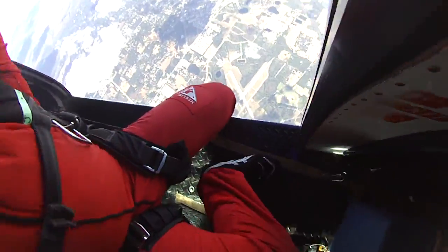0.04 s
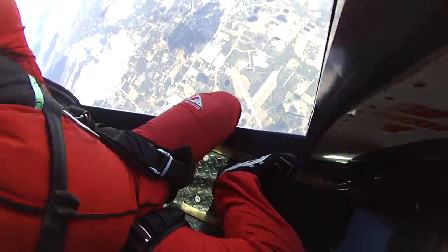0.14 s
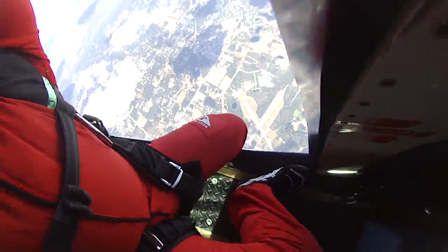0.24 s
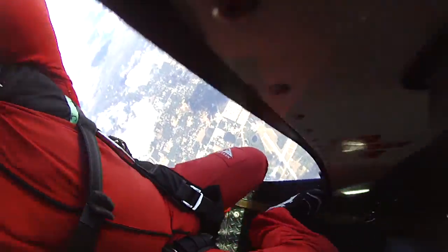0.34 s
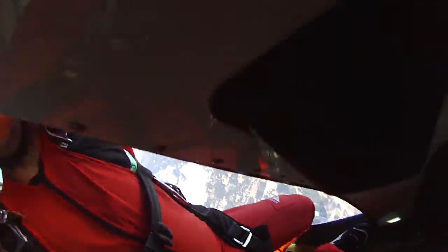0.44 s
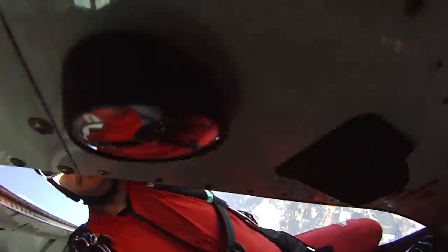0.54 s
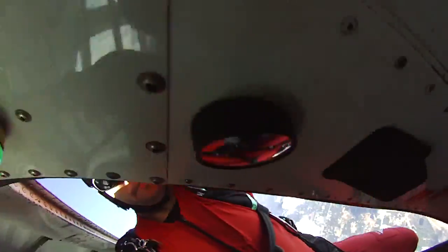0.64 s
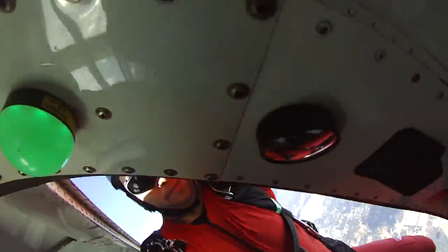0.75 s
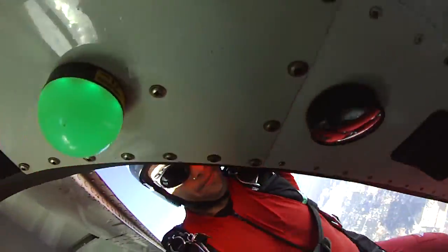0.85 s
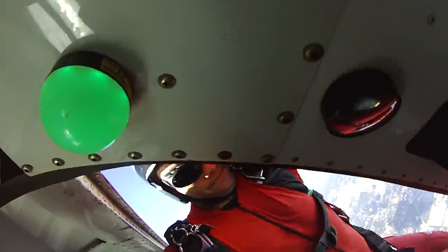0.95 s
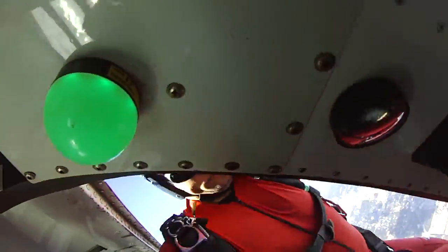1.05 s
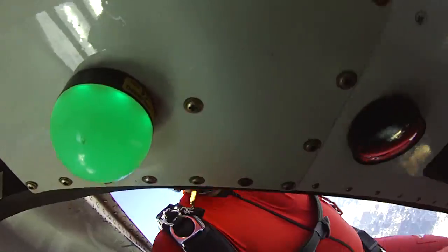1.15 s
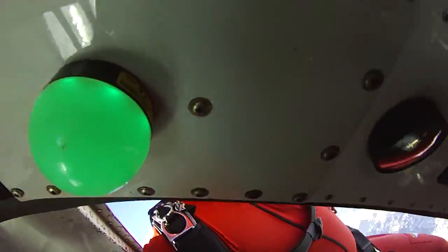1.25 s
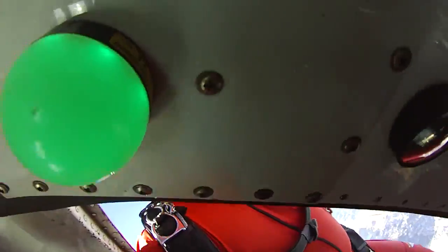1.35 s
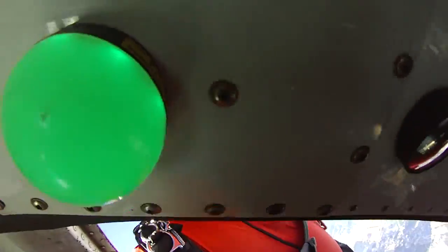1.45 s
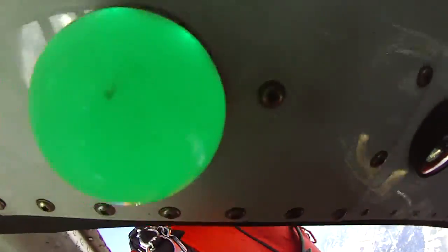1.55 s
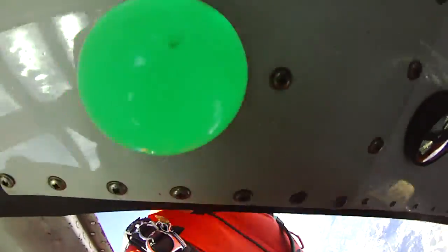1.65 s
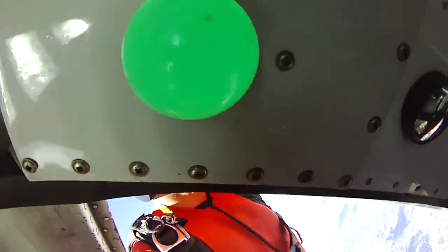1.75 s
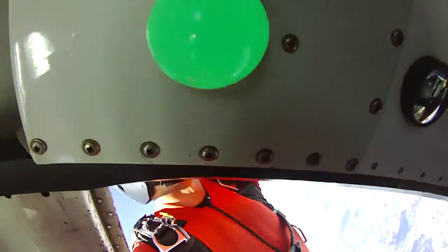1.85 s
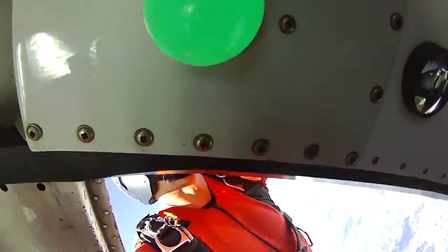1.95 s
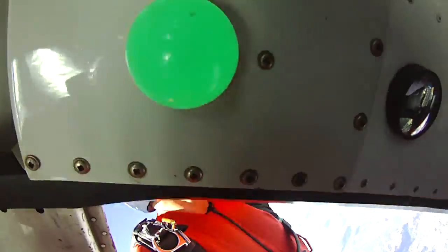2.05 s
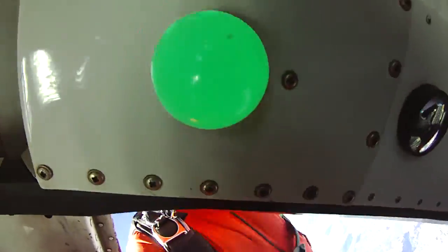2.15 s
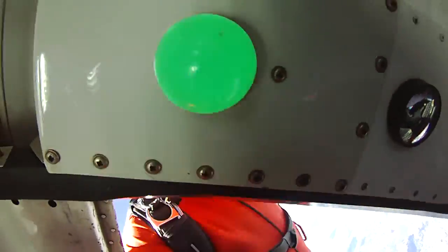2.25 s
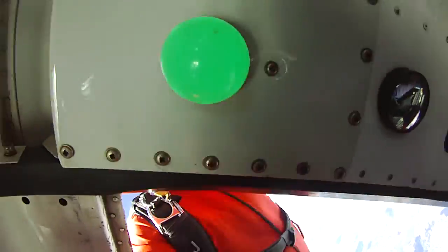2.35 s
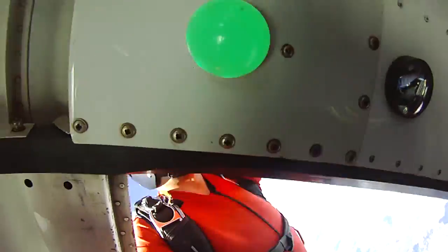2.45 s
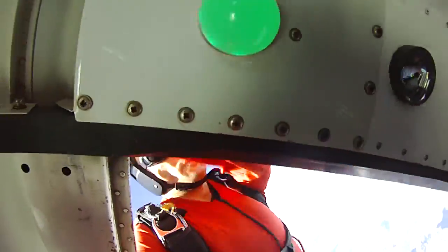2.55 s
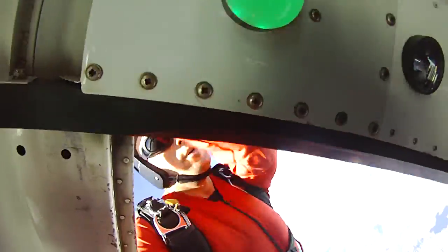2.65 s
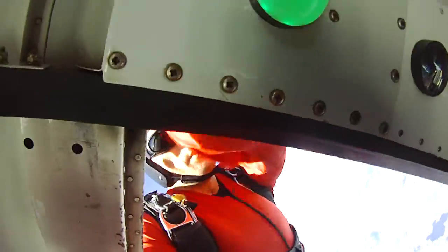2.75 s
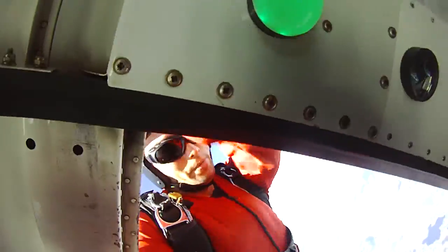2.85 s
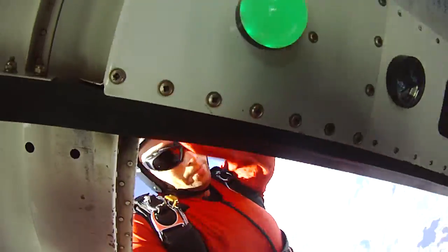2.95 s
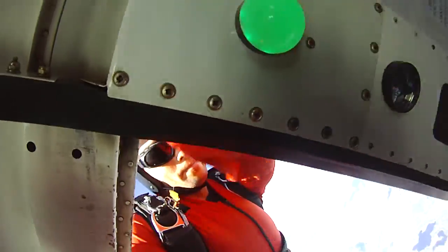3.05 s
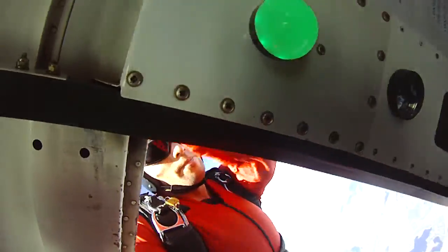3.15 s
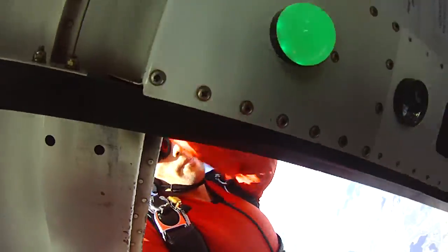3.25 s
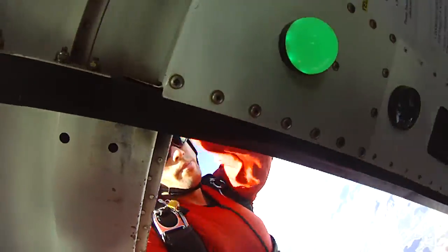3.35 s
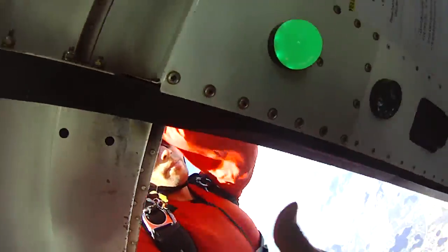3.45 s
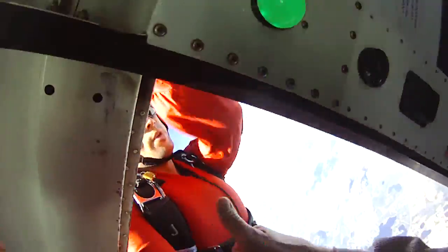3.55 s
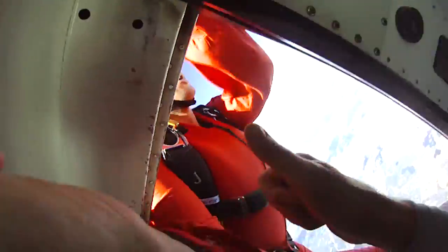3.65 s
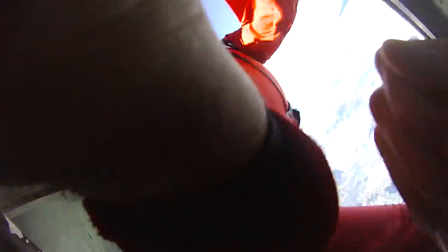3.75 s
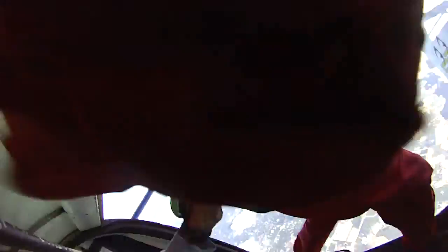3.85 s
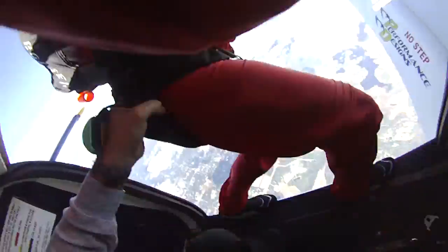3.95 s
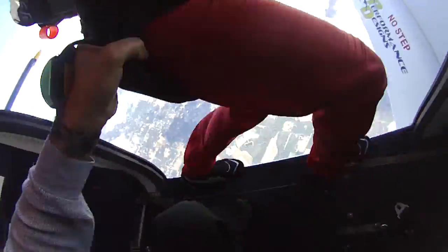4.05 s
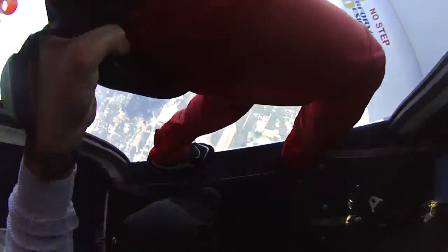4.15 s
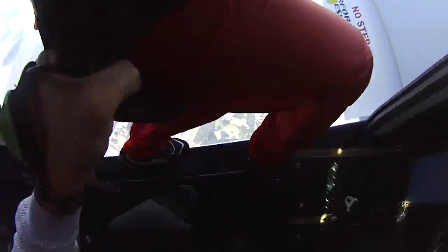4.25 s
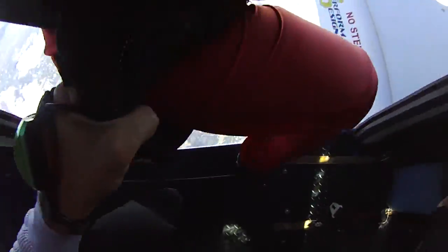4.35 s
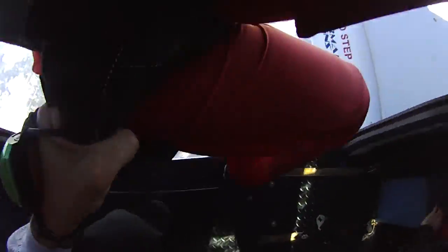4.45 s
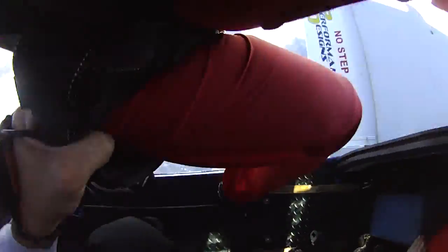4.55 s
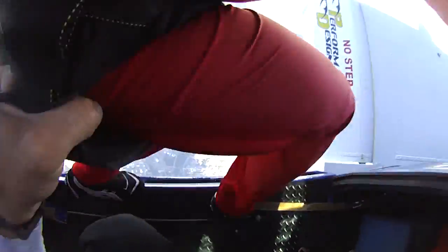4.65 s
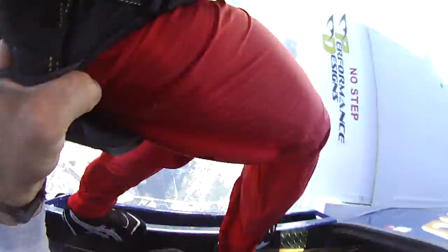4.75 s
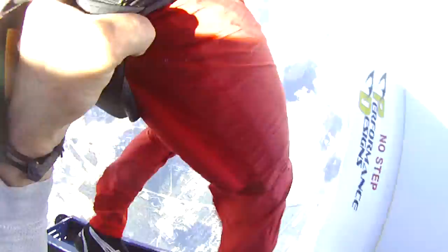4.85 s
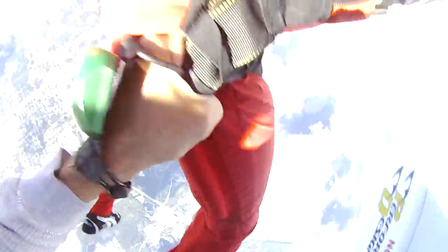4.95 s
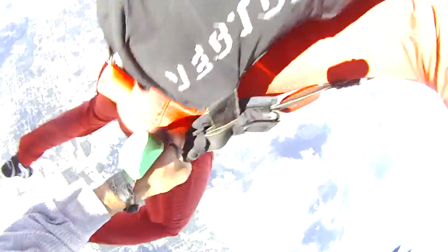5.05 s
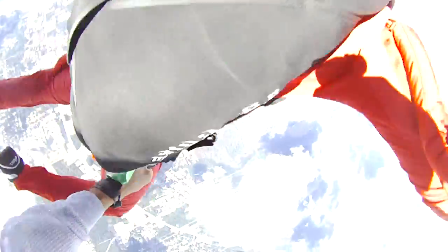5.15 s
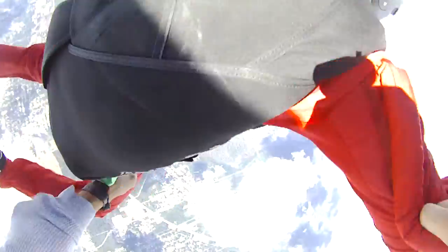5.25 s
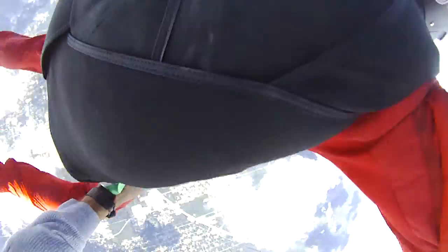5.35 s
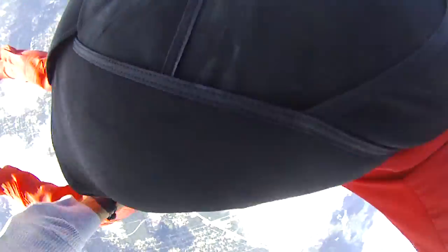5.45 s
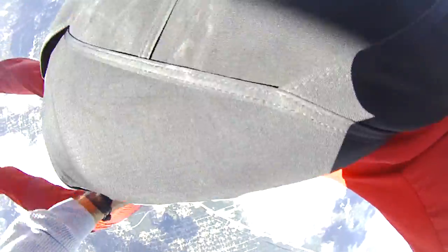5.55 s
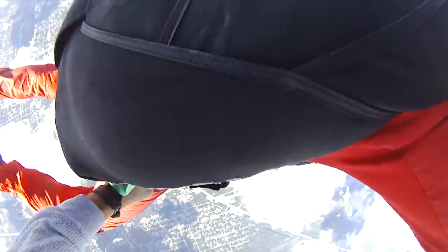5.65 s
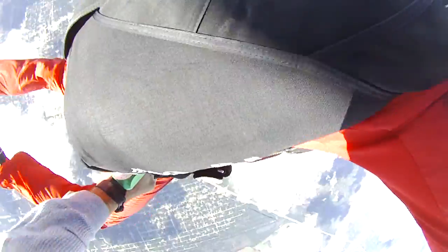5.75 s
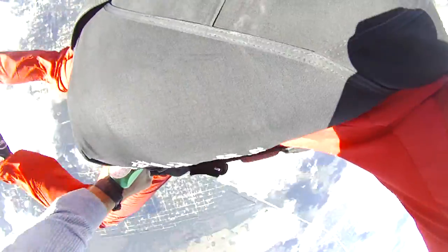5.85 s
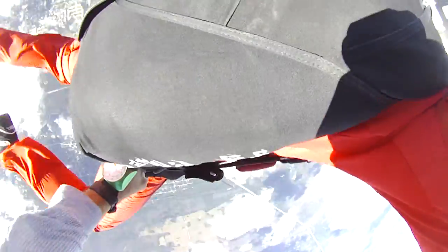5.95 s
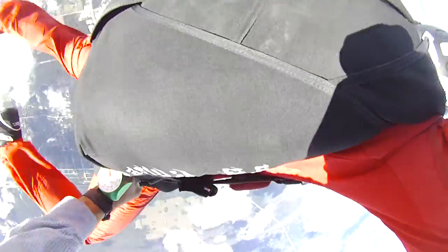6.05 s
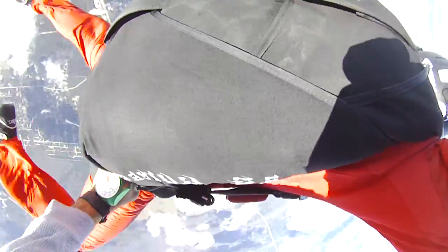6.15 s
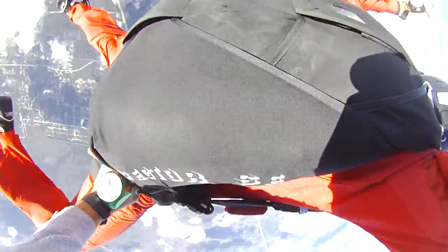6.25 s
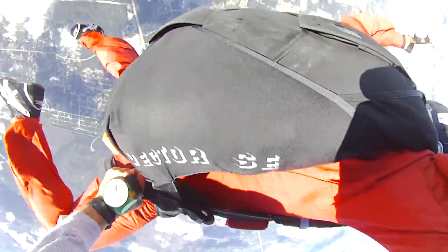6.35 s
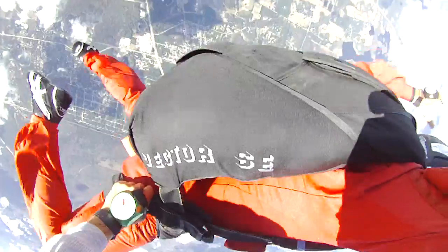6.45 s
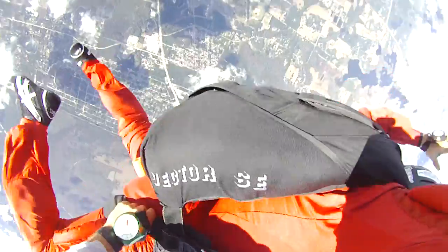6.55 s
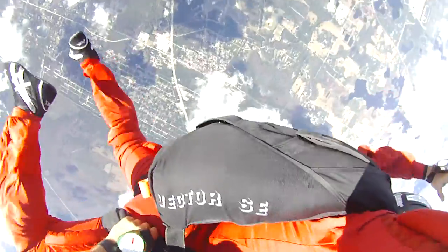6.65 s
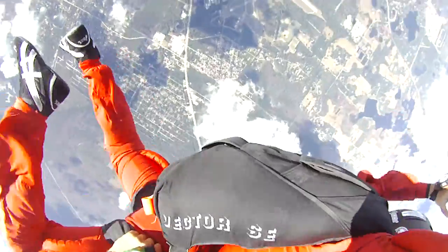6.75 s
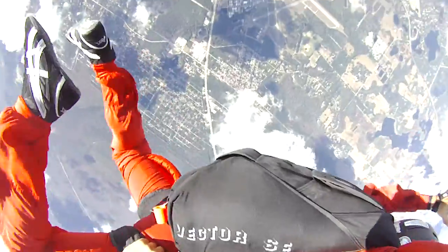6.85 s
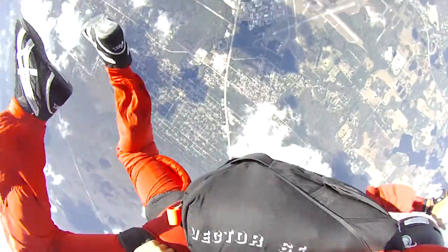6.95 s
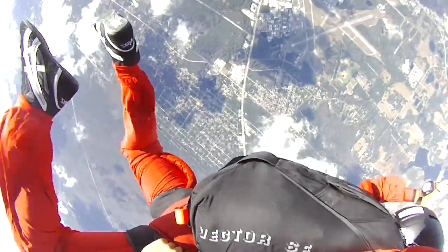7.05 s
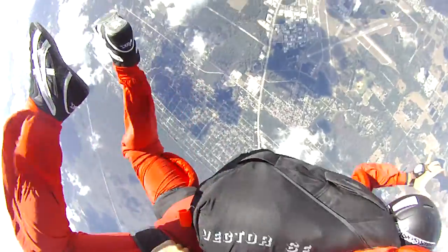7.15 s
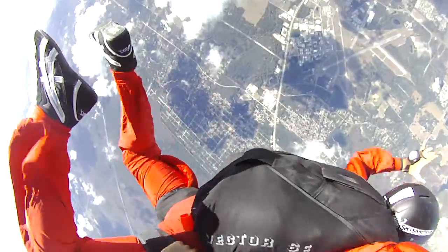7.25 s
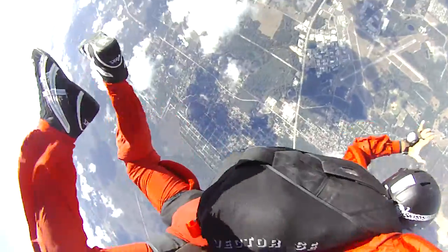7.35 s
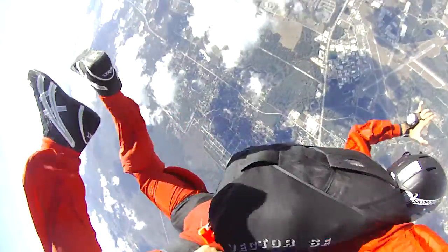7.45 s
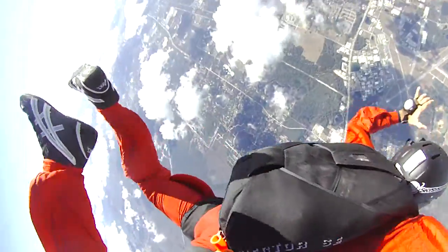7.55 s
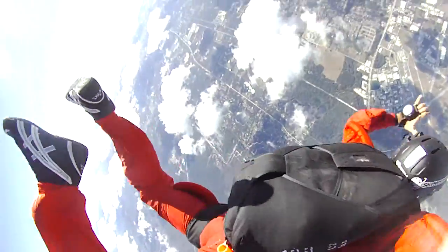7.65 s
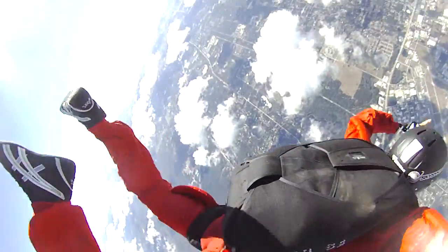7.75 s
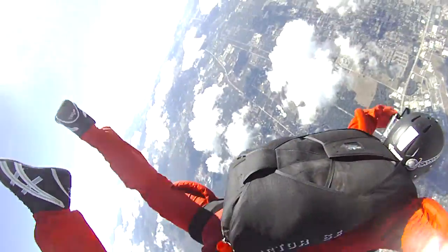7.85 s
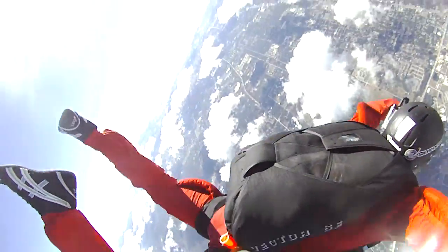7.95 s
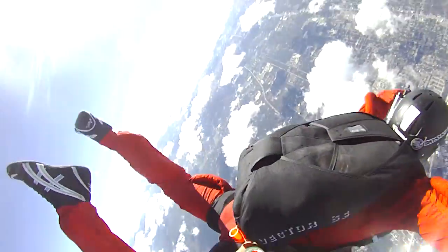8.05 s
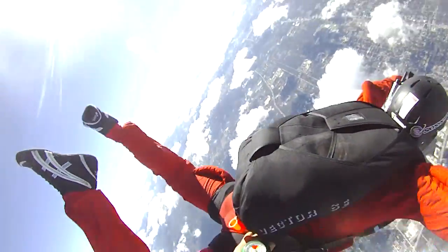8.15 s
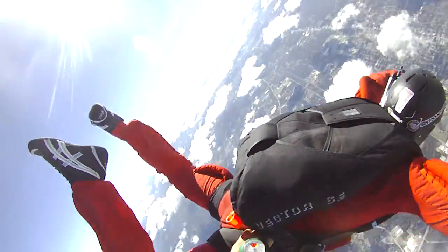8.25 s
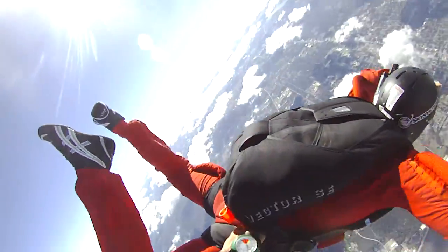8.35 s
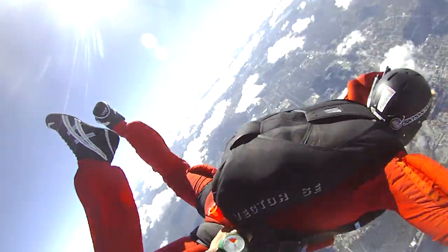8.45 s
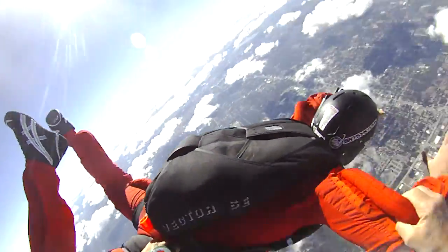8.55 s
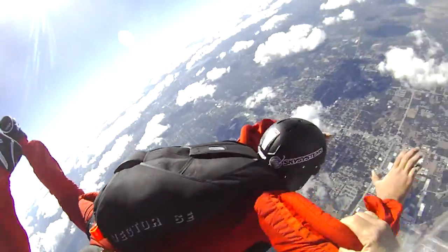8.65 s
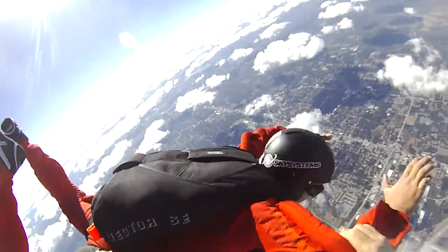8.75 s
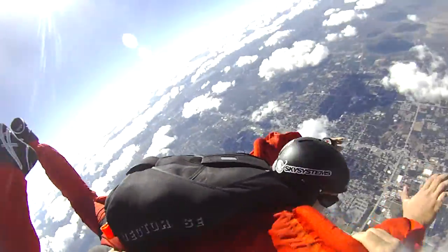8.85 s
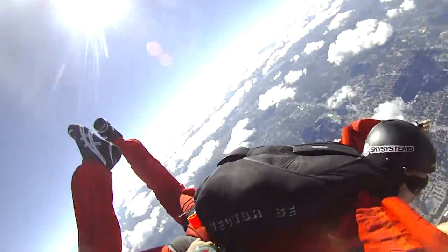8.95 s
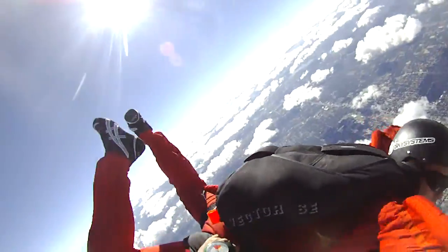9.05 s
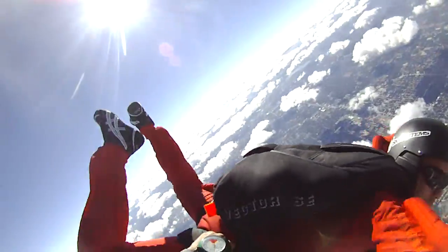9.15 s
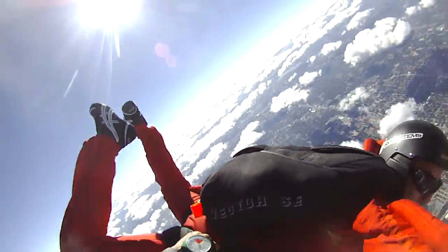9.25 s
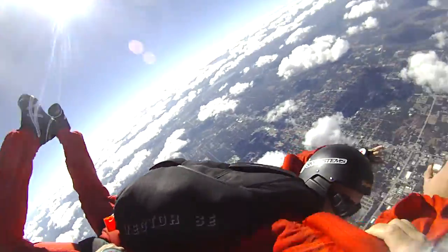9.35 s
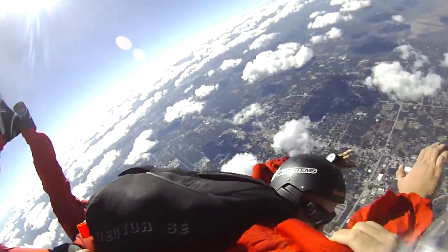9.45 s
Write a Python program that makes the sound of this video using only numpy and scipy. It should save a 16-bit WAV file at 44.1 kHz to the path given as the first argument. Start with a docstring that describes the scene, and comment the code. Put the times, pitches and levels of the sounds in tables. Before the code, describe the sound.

A small helmet microphone hears steady muffled aircraft rumble, with gusts of air at the door and an almost buried propeller hum. A short bright rattle of buckles precedes fluttering wind. The skydiver drops out and harsh, roaring slipstream swamps everything, tearing and snapping. Later the microphone is sheltered: the wind becomes far softer, dull and uneven, with dense membrane pops, tiny dropouts and a rise at the end.

```python
"""A cabin roars around a skydiver who waits, helmet camera on, at the open door of a propeller aircraft.
Close by, harness metal rings as it knocks and slides, and cloth rustles in grainy noise.
On the climb out the slipstream tears across the microphone: noise bands switched by shared eddies.
In the fall the microphone turns into the lee, where the wind is dull and lumpy.
Eddies pop its membrane: each is a filtered push with a crackle, and some leave it deaf for an instant."""
import sys
import numpy as np
from scipy import signal
from scipy.io import wavfile
from scipy.ndimage import uniform_filter1d

SR = 44100
rng = np.random.default_rng(int(sys.argv[2]) if len(sys.argv) > 2 else 0)


def bounce(signal):
    """Save signal as a 16-bit WAV file at the path given by the first command-line argument."""
    frames = np.transpose(np.atleast_2d(signal))
    limited = np.clip(frames, -1, 1)
    pcm = np.round(limited * 32767).astype(np.int16)
    wavfile.write(sys.argv[1], SR, pcm)


N = 419832
TIME = np.arange(N) / SR

# Hiss of the surrounding air in the camera housing. Each row: time in seconds, level in dB.
HISS = [(0, -70.5), (.35, -67.5), (1.6, -66.5), (2.9, -63.5), (3.7, -67), (4.3, -64.5), (7.6, -68.5),
        (8.05, -73), (8.6, -68), (9.15, -69), (9.5, -69)]
# Resonances of the housing. Each row: centre in Hz, width in Hz, relative level in dB.
HOUSING = [(3190, 1100, 1), (3620, 320, -6.5), (4460, 410, -0.5), (4900, 230, -4.5), (5820, 1170, -2),
           (7400, 1200, -14.5), (8580, 1000, -8), (9570, 1000, -11.5), (11700, 2800, -13.5)]
HISS_FOLLOWS = 0.6   # share of each swell of the rush, in dB per dB

# Cabin roar, fading as the aircraft is left behind. Each row: time in seconds, level in dB.
CABIN = [(0, -40), (0.65, -36.5), (1.1, -41), (1.5, -37.5), (2.8, -35.5), (3.7, -37), (4.1, -38.5),
         (5.0, -50), (6.5, -81.5)]
# Spectrum of the roar. Each row: frequency in Hz, relative density in dB per Hz.
CABIN_COLOUR = [(20, -26), (40, -5.5), (80, -3), (130, 2), (200, -1), (300, -3.5), (420, -6.5), (800, -13),
                (1150, -15.5), (1900, -22.5), (2600, -27.5), (5000, -60)]
# Air swells and ebbs through the door.
# Each row: centre in seconds, rise in dB, length in seconds, extra rise of the rush in dB.
SWELLS = [(0.392, 0.5, 0.077, 6), (0.5, 0.5, 0.19, 5), (0.676, -7, 0.24, -0.5), (0.903, 2.5, 0.21, 3),
          (1.09, 0.5, .1, 1.5), (1.234, 4.5, 0.11, 5), (1.408, -0.5, 0.17, 2.5), (1.684, -3.5, 0.098, -0.5),
          (1.8, 3.5, 0.11, 3.5), (2.51, -1, .05, 2), (2.7, 1.5, 0.09, 3), (2.997, 1, 0.038, 7),
          (3.11, -1, 0.21, -0.5), (3.54, 5.5, 0.029, 0.5), (3.73, 3, 0.083, 0)]
RUSH_DB, RUSH_FOLLOWS = -10.5, 0.086   # upper rush against the rumble; its share of each swell
PROPELLER_HZ, PROPELLER_DB = 178, -14   # mean blade tone; its level against the rumble without swells

# Cloth brushes by. Each row: centre in seconds, level in dB before dulling, length in seconds.
RUSTLES = [(0.435, -52, 0.02), (3.789, -50, .008)]

# Harness metal knocks together.
# Each row: start in seconds, peak in dB, strongest ring in Hz, dry tick against the ring (ratio).
CLINKS = [(1.132, -52, 8500, 2), (3.859, -47, 5900, .5), (3.884, -29.5, 4500, 0.6), (3.896, -36, 5900, 0.6),
          (3.908, -37, 4900, .8), (3.917, -36, 4400, 0.87), (3.9435, -33, 4400, 0.67),
          (4.041, -44, 6000, .8), (4.2, -42, 5000, 1.7)]
# Harness metal slides. Each row: the four columns of a clink, then length in seconds.
SCRAPES = [(3.8, -47.5, 6100, .05, 0.037), (3.926, -36.5, 4200, 0.3, 0.074),
           (3.968, -30, 4200, 0.35, 0.025)]
# Modes of the metal. Each row: frequency in Hz, relative level in dB, 60 dB decay time in seconds.
METAL = [(3890, 1, 0.018), (4320, -4, 0.0088), (4570, -1, 0.007), (5030, -2, .009), (5780, -3, .01),
         (6170, -1, 0.01), (7300, 4, .003), (8700, 16, 0.0039), (10300, 5, .003)]
CLINK_CONTACT_S, SLIPS_PER_S = 0.0008, 5400
RING_FALL_DB_PER_OCTAVE = 21   # away from the strongest ring

# Stream at the microphone: climbing out, falling, turning into the lee.
# Each row: time in seconds, level of the roar in dB.
FLOW = [(3.66, -67), (3.78, -39.5), (3.9, -35), (4, -34), (4.47, -27.5), (4.53, -17), (5.25, -17),
        (5.39, -16), (5.56, -16), (6.1, -16), (6.78, -19), (7.42, -18.5), (7.68, -26), (8.02, -34),
        (8.7, -32.5), (9.13, -34), (9.32, -30), (9.52, -24)]
# Gusts and lulls on top of the stream.
# Each row: centre in seconds, rise in dB, length in seconds, extra tearing in dB.
GUSTS = [(3.97, 5.5, 0.055, -5), (4.253, 5.5, 0.052, 1), (4.358, 4.5, 0.026, 6), (4.406, -4, .03, 1),
         (4.608, 6.5, 0.034, 1.5), (4.67, -2, 0.11, 8.5), (4.79, -5, 0.046, 11), (4.88, 6, 0.013, -3),
         (5.007, 5.5, 0.017, -4.5), (5.123, -5, 0.015, 0.5), (5.363, -4.5, 0.046, -5),
         (5.429, -3.5, 0.027, -8), (5.563, 3.5, 0.056, 0.5), (5.616, -12, 0.015, 11),
         (5.669, 4.5, 0.089, -2.5), (5.695, -4.5, 0.03, -2), (5.774, 1, 0.17, 4), (5.855, -1, 0.034, -2.5),
         (5.899, 6.5, 0.023, -4), (5.985, 5.5, 0.024, -6), (6.298, 0.5, .05, -6.5), (6.588, -5, 0.025, 8.5),
         (6.995, -2.5, 0.063, 3), (6.355, 2, 0.079, 0.5), (7.363, 3, 0.055, -1.5), (7.684, 2, 0.022, -1),
         (7.795, 3.5, 0.033, 2), (8.036, 0, 0.043, 2), (8.129, 4, 0.036, 8.5), (8.31, -0.5, 0.025, -8),
         (8.714, -0.5, .03, 2), (9.07, -1, 0.038, 5), (8.286, 1, 0.1, 7), (8.473, 1.5, 0.15, 8.5),
         (8.61, 5, 0.12, -1), (8.788, 9.5, 0.028, -1), (8.878, 6.5, 0.072, 2), (9.01, 2, 0.047, 5),
         (9.217, 8, 0.02, -1), (9.31, 5.5, 0.039, 0), (9.401, 10, 0.014, -5)]
# Spectrum of the wind. Each row: frequency in Hz, relative density in dB per Hz.
WIND_COLOUR = [(25, -35), (50, -11.5), (90, -5.5), (160, 0.5), (280, 0.5), (450, -5.5), (800, -13.5),
               (1500, -20), (2200, -27.5), (3200, -37), (6000, -45.5), (10000, -60.5), (14000, -70.5)]
# How exposed the microphone port is.
# Each row: time in seconds, tearing against the roar in dB, treble lift in dB, spread of the spitting in dB.
EXPOSURE = [(3.8, -11.5, -9, 4), (4.3, -10.5, -15, 5), (4.65, -19.5, -1.5, 3), (4.9, -14, 3, -3),
            (5.08, -11.5, 11.5, 4), (5.39, -17.5, 5.5, 0), (5.6, -22, 8, 8), (6.12, -14.5, 9, 5.5),
            (6.42, -19, 6, 1.5), (7.15, -16.5, 7, 5.5), (7.5, -25, 2.5, 15), (7.72, -24, 0.5, 5),
            (8.3, -20, -3.5, 4), (9.52, -19.5, -3.5, 4)]
# A weak stream is lumpy, a strong one smoother.
# Each row: flow in dB, low buffeting in dB, spread of the eddies in dB.
CHARACTER = [(-64, -78, 15), (-36.5, -50, 9), (-33, -33, 13), (-25, -32.5, 15), (-25, -35, 9),
             (-2, -40, 2.5)]
# Sharp rips of the flow.
# Each row: centre in seconds, strength in eddy spreads, half-length in ms, extra treble lift in dB.
RIPS = [(4.234, 1.8, 2.5, -2), (4.244, 1.4, 2.5, 1), (4.367, 1.3, 2.4, 1), (4.608, 1.3, 2.1, 3),
        (4.624, 1.6, 3.2, 2), (5.186, 1.8, 3.1, -4), (5.631, 2.2, 2.2, -12), (7.118, 1.4, 2.1, -2),
        (7.369, 1.4, 1.2, 9), (7.382, 1.2, 0.93, 7.5), (7.4067, 1.5, 1.1, 7), (7.4109, 1.8, 1.3, 10),
        (7.437, 1.4, 2, 3), (7.452, 1.4, 1.3, 10), (7.466, 1.9, 1.9, 10), (7.498, 1.8, 2, 11),
        (7.568, 1.63, 3.6, 21.5), (7.612, 1, 5, 12), (7.974, 2.15, 4.6, 7), (8.148, 1.2, 4, 5),
        (8.185, 1.9, 2, 0), (8.274, 2.4, 1.8, -4), (8.609, 1.3, 3, 7), (8.788, 1.1, 1.8, 5),
        (8.83, 1.5, 2.2, 8), (8.886, 1.2, 2.5, 5), (8.96, 2.3, 3, -2), (8.993, 1.8, 1.9, -1),
        (9.294, 2.3, 3, -3), (9.379, 2, 1.7, -2)]
SPITS_PER_S, SPIT_ABOVE_HZ = 730, 2500   # the tiniest eddies, heard mostly in the treble

# Big eddies that hit the membrane.
# Each row: time in seconds, peak in dB before dulling, rise in ms, deaf time in ms (none if negative),
# top of the snap in Hz, crackle against that peak in dB.
POPS = [(3.792, -13, 2.5, 0, 900, -40), (4.424, -13, 0.97, 0, 1000, -31),
        (4.525, -5, 0.98, -2.5, 1500, -22), (5.147, 1.5, 0.29, 3, 2500, -28),
        (5.1835, 4, 0.1, 1.5, 7000, -17), (5.374, -7.5, 0.11, -1.5, 5000, -21),
        (5.487, -6, 0.33, -4, 4000, -17), (5.632, 0, 0.39, -4, 3000, -27), (7.369, -10, .36, 0, 3000, -26),
        (7.767, -12, 1, -5, 2000, -25), (7.8528, -11, 1.7, -3, 1800, -33),
        (7.928, -18.5, 0.63, -3, 4500, -21), (7.9444, -14, 0.79, 7, 3200, -21),
        (8.135, -11, 0.62, 2.5, 4500, -22), (8.221, -13.5, 0.85, 5.5, 4500, -32),
        (8.408, -14.5, 1.2, 1, 1800, -27), (8.419, -14, .6, 5, 2500, -21),
        (8.434, -11.5, 1.5, 5.5, 1400, -32), (8.455, -13, 1.1, 5.5, 3500, -28),
        (8.476, -13.5, 0.74, -2, 2000, -25), (8.564, -18, 1.7, -2.5, 900, -34),
        (8.571, -11, 1.1, 2, 1200, -25), (8.635, -14.5, 1.2, -1, 3500, -24),
        (8.742, -4, .48, 10, 3000, -29), (8.8226, -15, .35, 3.5, 5000, -21),
        (8.834, -11.5, 0.44, 8, 6000, -21), (8.8962, -12.5, 0.84, 5, 6000, -31),
        (8.9084, -8, 0.72, -3, 600, -33), (8.9211, -14, 1.1, 1, 3500, -28),
        (8.957, -14, 1.2, -0.5, 1500, -25), (8.984, -14.5, 0.52, 6.5, 6000, -31),
        (9.006, -12.5, 1.4, -3, 4000, -31), (9.024, -27, 1.2, 6.5, 4000, -20),
        (9.032, -15, 1.9, -1.5, 900, -32), (9.042, -13.5, 0.44, -5, 2500, -22),
        (9.107, -15, 1.9, 3.5, 2000, -28), (9.201, -20, 1.1, 1.5, 2500, -25),
        (9.2161, -13.5, 0.73, 5, 2500, -22), (9.261, -14.5, 0.93, 0, 1800, -20),
        (9.3247, -9.5, 1.2, 0, 1500, -31), (9.335, -13.5, 0.88, -3, 3000, -28),
        (9.386, -18, 1, 0, 2500, -27), (9.399, -11, .9, 1.5, 2200, -23),
        (9.453, -12.5, 0.73, 0.5, 3000, -26), (9.464, -17, 1, 1, 2200, -24)]
# Small eddies pop at random in the lee; rise and snap are means, the deaf time is the longest.
LEE_START_S, LEE_END_S = 7.6, 9.48
SMALL_POPS_PER_S, SMALL_POP_OVER_FLOW_DB, SMALL_POP_RISE_MS = 8, 5, 0.59
SMALL_POP_HELD_MS, SMALL_POP_SNAP_HZ, SMALL_POP_CRACKLE_DB = 1.5, 2500, -22
CRACKLE_S, CRACKLE_LEAD_S = 0.00097, 0.00054   # decay to either side; how far its top precedes the hit
CRACKLE_FALL_DB_PER_OCTAVE, CRACKLE_UNEVEN_DB = 9, 6
POP_TOP_HZ, CUTOFF_HZ = 11000, 15600   # upper limits of the pops and of the microphone channel


def from_db(db):
    """Decibels to gain."""
    return 10 ** (np.asarray(db) / 20)


def rms_one(x):
    """Scale to unit power."""
    return x / np.sqrt(np.mean(x ** 2) + 1e-20)


def in_time(rows):
    """Each column of a curve at every sample."""
    s, *columns = np.transpose(rows)
    return [np.interp(TIME, s, column) for column in columns]


def at_hz(points, hz):
    """Read a spectrum on a log-frequency axis."""
    point_hz, level_db = np.transpose(points)
    return np.interp(np.log(hz), np.log(point_hz), level_db)


def hump(s, length_s):
    """A smooth rise to 1 and fall, length_s wide at half height."""
    return np.exp2(-(2 * (TIME - s) / length_s) ** 2)


def drift(rate):
    """Smooth chance of spread about 1 that changes about rate times a second, without extreme swings."""
    # computed at an eighth of the sample rate; the filter's run-in is dropped
    pole = np.exp(-16 * np.pi * rate / SR)
    steps = rng.standard_normal(N // 8 + 8002)
    slow = signal.lfilter([1], [1, -2 * pole, pole * pole], steps)[8000:]
    limited = 3.3 * np.tanh(rms_one(slow) / 3)
    return np.interp(np.arange(N) / 8, np.arange(len(slow)), limited)


def band_noise(low, high):
    """Noise of unit power between two frequencies."""
    sos = signal.butter(2, [low, min(high, .45 * SR)], "band", fs=SR, output="sos")
    return rms_one(signal.sosfilt(sos, rng.standard_normal(N)))


def flutter(chance, spread_db):
    """A gain that swings by spread_db and roughly keeps the mean power."""
    swing = np.log(10) * spread_db / 20
    return np.exp(swing * chance - swing ** 2)


def airflow(colour, zones, levels_db, eddies, spread_db, small_eddy_hz, own_share, spit_db=0):
    """Turbulence in half-octave noise bands that follow zone levels; shared eddies move the upper bands."""
    edges = 22 * 2 ** (np.arange(20) / 2)
    centres = np.sqrt(edges[1:] * edges[:-1])
    power = from_db(at_hz(colour, centres)) ** 2 * np.diff(edges)
    # lift that brings the power of each zone to its level
    power_below = np.concatenate([[0], np.cumsum(power)])
    lifts_db = []
    for zone, db in zip(zones, levels_db):
        zone_power = np.diff(np.interp(zone, edges, power_below))
        lifts_db.append(db - 10 * np.log10(zone_power))
    middles = np.log(zones).mean(axis=1)
    own_share = np.clip(own_share, 0, 1)
    spits = drift(SPITS_PER_S)
    out = 0
    for k, hz in enumerate(centres):
        # blend the lifts of the neighbouring zones
        lift_db = 0
        for pick, db in zip(np.eye(len(zones)), lifts_db):
            lift_db = lift_db + np.interp(np.log(hz), middles, pick) * db
        own_eddies = drift(min(hz / 10, 250))
        chance = np.sqrt(1 - own_share) * eddies + np.sqrt(own_share) * own_eddies
        grain = flutter(chance, spread_db * hz / (hz + small_eddy_hz))
        grain = grain * flutter(spits, spit_db * hz ** 2 / (hz ** 2 + SPIT_ABOVE_HZ ** 2))
        band = band_noise(edges[k], edges[k + 1])
        out = out + np.sqrt(power[k]) * from_db(lift_db) * grain * band
    return out


def door_swells():
    """How far air swelling through the door lifts the cabin's rumble and its rush, in dB."""
    rumble_db = sum(db * hump(s, length) for s, db, length, _ in SWELLS)
    extra_db = sum(db * hump(s, length) for s, _, length, db in SWELLS)
    return rumble_db, RUSH_FOLLOWS * rumble_db + extra_db


def housing_hiss(swell_db):
    """The treble of the surrounding air gets in through the resonances of the camera housing."""
    hiss = sum(from_db(db) * band_noise(hz - width / 2, hz + width / 2) for hz, width, db in HOUSING)
    level_db = in_time(HISS)[0] + HISS_FOLLOWS * swell_db
    return rms_one(hiss) * from_db(level_db) * flutter(drift(50), spread_db=1.4)


def cabin(rumble_swell_db, rush_swell_db):
    """Air tumbles past the open door; the propeller's blade tone is nearly buried in it."""
    zones = [(60, 500), (700, 2500)]   # rumble and rush, Hz
    levels_db = [rumble_swell_db, RUSH_DB + rush_swell_db]
    roar = airflow(CABIN_COLOUR, zones, levels_db, drift(35), spread_db=2.0, small_eddy_hz=250, own_share=1.0)
    # the closed housing shuts out the treble
    muffled = signal.sosfilt(signal.butter(5, 2200, fs=SR, output="sos"), roar)
    blade_hz = PROPELLER_HZ * (1 + 0.0076 * drift(2.9))
    phase = 2 * np.pi * np.cumsum(blade_hz) / SR
    blade_tone = np.sin(phase) * flutter(drift(3.1), spread_db=3.5)
    propeller = from_db(PROPELLER_DB) * rms_one(blade_tone)
    level_db, = in_time(CABIN)
    return (muffled + propeller) * from_db(level_db)


def cloth():
    """A sleeve brushes past the helmet: a brief, dull, grainy rustle."""
    strokes = sum(from_db(db) * hump(s, length_s) for s, db, length_s in RUSTLES)
    rustle = strokes * band_noise(2100, 5800) * flutter(drift(250), spread_db=4)
    # the tiny offset keeps the filter away from vanishing numbers
    return signal.sosfilt(signal.butter(3, 5800, fs=SR, output="sos"), rustle + 1e-18)


def metal(touch, ring_hz, tick):
    """A touch rings the metal, most strongly near ring_hz, and is also heard dry; peak 1."""
    age = np.arange(SR // 20) / SR
    modes = 0
    for hz, level_db, t60 in METAL:
        distance_db = RING_FALL_DB_PER_OCTAVE * abs(np.log2(hz / ring_hz))
        decay = from_db(level_db - distance_db - 60 * age / t60)
        modes = modes + decay * np.sin(2 * np.pi * hz * age)
    ring = signal.fftconvolve(touch, modes)[:len(touch)]
    sound = rms_one(ring) + tick * rms_one(touch)
    # parts this small radiate only treble, and the housing dulls the very top
    small = signal.butter(7, 3700, "high", fs=SR, output="sos")
    dull = signal.butter(2, 7000, fs=SR, output="sos")
    sound = signal.sosfilt(np.vstack([small, dull]), sound)
    return sound / np.abs(sound).max()


def harness():
    """Buckles tick against each other, or slide with a grainy scrape that swells and stops."""
    out = np.zeros(N)
    age = np.arange(SR // 5) / SR
    for s, db, ring_hz, tick in CLINKS:
        touch = rng.standard_normal(len(age)) * np.exp(-age / CLINK_CONTACT_S)
        out[round(s * SR):][:len(age)] += from_db(db) * metal(touch, ring_hz, tick)
    for s, db, ring_hz, tick, length_s in SCRAPES:
        slips = rng.standard_normal(len(age)) * (rng.random(len(age)) < SLIPS_PER_S / SR)
        pressure = np.sin(np.pi * np.minimum(age / length_s, 1))
        out[round(s * SR):][:len(age)] += from_db(db) * metal(slips * pressure, ring_hz, tick)
    return out


def stream():
    """The strength of the stream with its gusts, and the extra tearing that they bring, in dB."""
    gusts_db = sum(db * hump(s, length) for s, db, length, _ in GUSTS)
    extra_db = sum(db * hump(s, length) for s, _, length, db in GUSTS)
    return in_time(FLOW)[0] + gusts_db, extra_db


def wind(flow_db, gust_tearing_db):
    """Large eddies break into small ones, so the tearing comes in bursts within bursts."""
    eddies = rms_one(0.069 * drift(26) + 0.98 * drift(164) + 0.88 * drift(330))
    # lulls are deep, while the speed of the stream caps the crests
    eddies = eddies - 0.46 * (eddies ** 2 - 1)
    tearing_db, sizzle_db, spit_db = in_time(EXPOSURE)
    for s, strength, half_length_ms, extra_db in RIPS:
        rip = np.maximum(1 - ((TIME - s) * 1000 / half_length_ms) ** 2, 0)
        eddies = eddies + (strength - eddies) * rip
        sizzle_db = sizzle_db + extra_db * rip
        spit_db = spit_db * (1 - rip)
    zones = [(30, 90), (150, 800), (1200, 3300)]   # buffeting, roar and tearing, Hz
    flows, *traits = np.transpose(CHARACTER)
    buffet_db, spread_db = [np.interp(flow_db, flows, trait) for trait in traits]
    levels_db = [buffet_db, flow_db, flow_db + tearing_db + gust_tearing_db]
    flow = airflow(WIND_COLOUR, zones, levels_db, eddies, spread_db,
                   small_eddy_hz=820, own_share=0.057, spit_db=spit_db)
    treble = signal.sosfilt(signal.butter(1, 4500, "high", fs=SR, output="sos"), flow)
    return flow + treble * (from_db(sizzle_db) - 1)


def small_pops(flow_db):
    """Chance pops in the lee that follow the strength of the stream; rows like those of POPS."""
    lee_s = LEE_END_S - LEE_START_S
    draws = rng.random((round(SMALL_POPS_PER_S * lee_s), 4))
    s = LEE_START_S + lee_s * draws[:, 0]
    db = flow_db[(s * SR).astype(int)] + SMALL_POP_OVER_FLOW_DB
    rise_ms = SMALL_POP_RISE_MS * (.5 + draws[:, 1])
    held_ms = SMALL_POP_HELD_MS * draws[:, 2]
    snap_hz = SMALL_POP_SNAP_HZ * (.5 + draws[:, 3])
    crackle_db = np.full(len(s), SMALL_POP_CRACKLE_DB)
    return list(zip(s, db, rise_ms, held_ms, snap_hz, crackle_db))


def crackle(age):
    """An eddy frays as it lands: a short burst in octave bands, each with a chance level of its own."""
    burst = 0
    for k, low in enumerate(800 * 2 ** np.arange(4)):
        sos = signal.butter(2, [low, 2 * low], "band", fs=SR, output="sos")
        level_db = CRACKLE_UNEVEN_DB * rng.uniform(-0.92, 1) - CRACKLE_FALL_DB_PER_OCTAVE * k
        burst = burst + from_db(level_db) * rms_one(signal.sosfilt(sos, rng.standard_normal(len(age))))
    return rms_one(burst) * np.exp(-np.abs(age + CRACKLE_LEAD_S) / CRACKLE_S)


def membrane(sound, hits, bass_cut_hz, relax_s):
    """Eddies push the membrane into a crackling pop; one held at its stop is deaf until it comes free."""
    pops, crackles, free = np.zeros(N), np.zeros(N), np.ones(N)
    age = np.arange(-SR // 50, SR // 25) / SR
    bass_pole = np.exp(-2 * np.pi * bass_cut_hz / SR)
    for s, db, rise_ms, held_ms, snap_hz, crackle_db in hits:
        rise_s, held_s = rise_ms / 1000, max(held_ms, 0) / 1000
        push = np.exp(np.minimum(age, 0) / rise_s - np.maximum(age, 0) / relax_s)
        pop = signal.lfilter([1, -2, 1], [1, -2 * bass_pole, bass_pole ** 2], push)
        # a glancing eddy thuds, a direct one snaps
        snap_pole = np.exp(-2 * np.pi * snap_hz / SR)
        pop = signal.lfilter([1], [1, -snap_pole], pop)
        pop = from_db(db) * pop / np.abs(pop).max()
        start = round((s + age[0]) * SR)
        pops[start:start + len(age)] += pop[:N - start]
        crackles[start:start + len(age)] += (from_db(db + crackle_db) * crackle(age))[:N - start]
        free[round(s * SR):round((s + held_s) * SR)] = 0
    dull = signal.butter(4, min(POP_TOP_HZ, .45 * SR), fs=SR, output="sos")
    hearing = uniform_filter1d(uniform_filter1d(free, size=50), size=50)
    return sound * hearing + signal.sosfilt(dull, pops + crackles)


def scene():
    """All of the air, far and near, reaches one small microphone."""
    rumble_swell_db, rush_swell_db = door_swells()
    flow_db, gust_tearing_db = stream()
    air = housing_hiss(rush_swell_db) + cabin(rumble_swell_db, rush_swell_db)
    air = air + cloth() + harness() + wind(flow_db, gust_tearing_db)
    hits = list(POPS) + small_pops(flow_db)
    return membrane(air, hits, bass_cut_hz=138, relax_s=0.00098)[None]


def record(dry):
    """The deepest bass is lost, the highest peaks are rounded and the top is cut."""
    thin = signal.sosfilt(signal.butter(2, 28, "high", fs=SR, output="sos"), dry)
    rounded = thin / (1 + thin ** 6) ** (1 / 6)
    return signal.sosfilt(signal.ellip(10, .1, 80, CUTOFF_HZ, fs=SR, output="sos"), rounded)


dry = scene()
out = record(dry)
bounce(out)
```